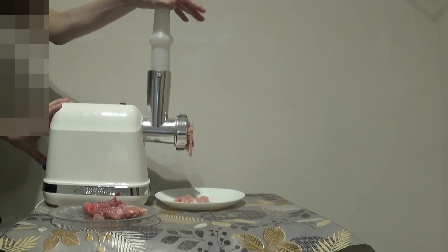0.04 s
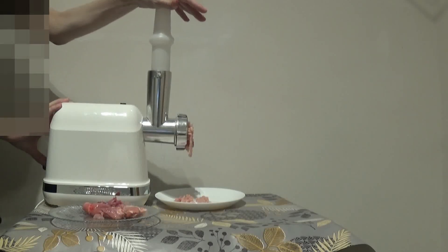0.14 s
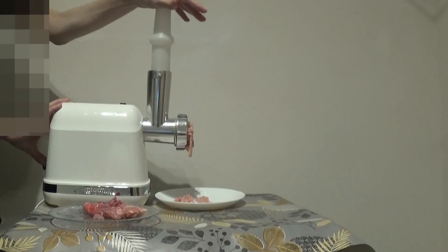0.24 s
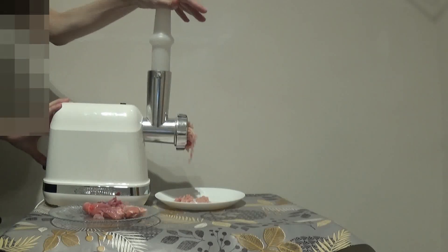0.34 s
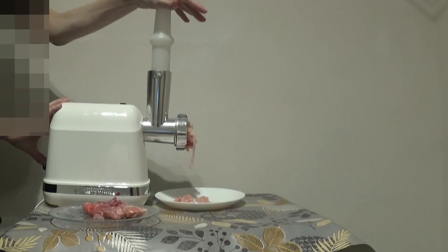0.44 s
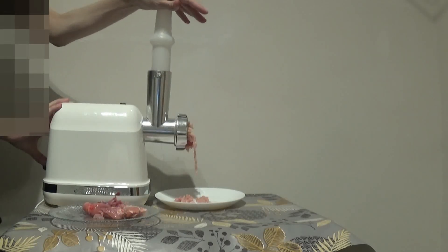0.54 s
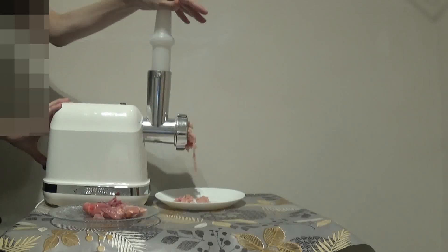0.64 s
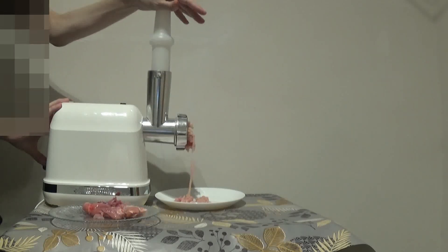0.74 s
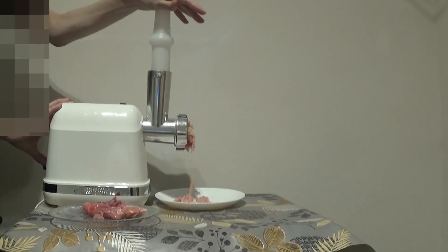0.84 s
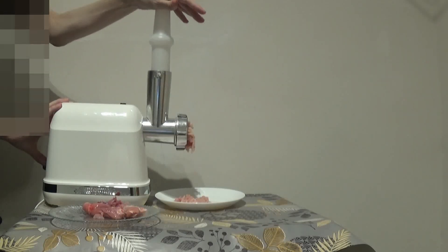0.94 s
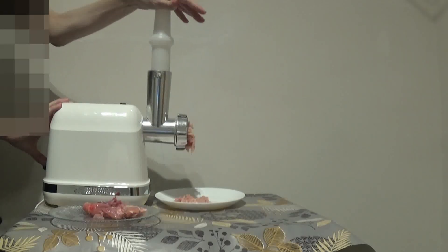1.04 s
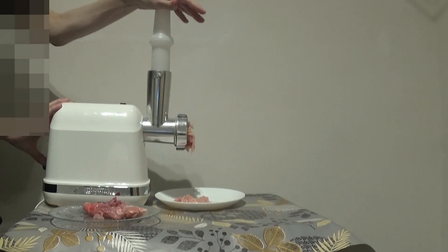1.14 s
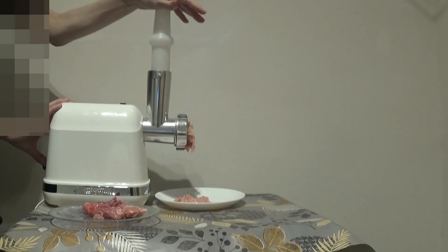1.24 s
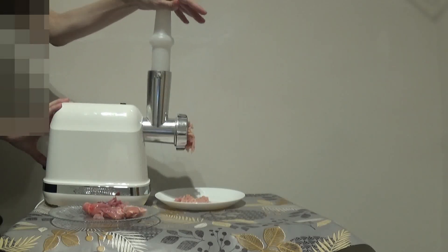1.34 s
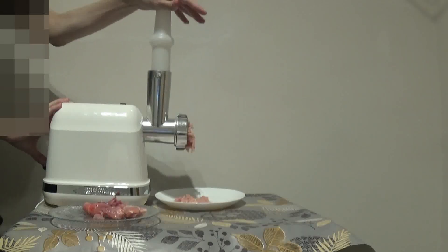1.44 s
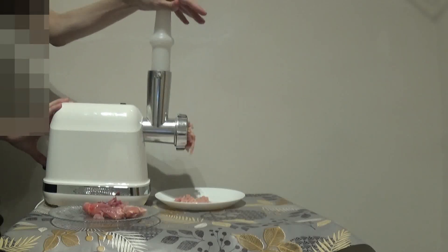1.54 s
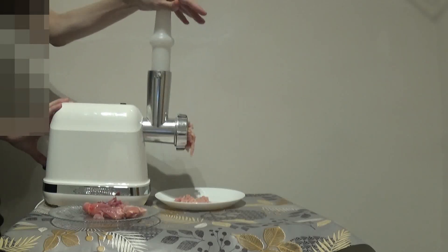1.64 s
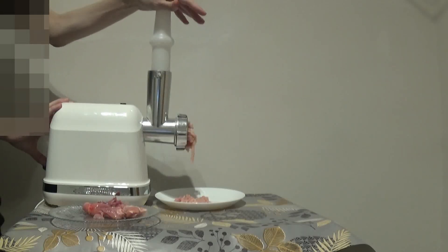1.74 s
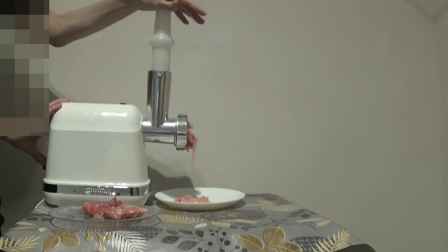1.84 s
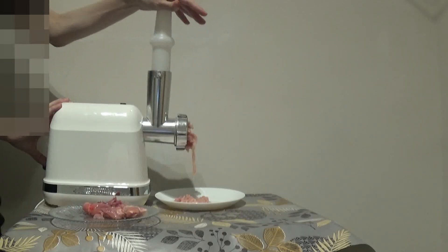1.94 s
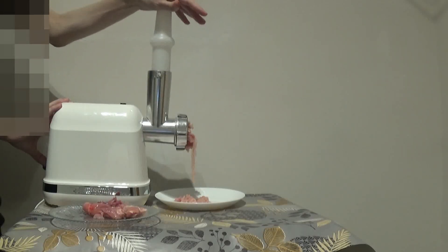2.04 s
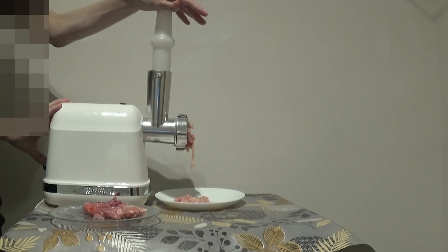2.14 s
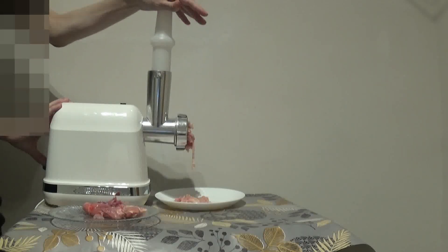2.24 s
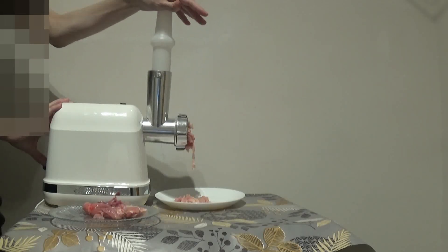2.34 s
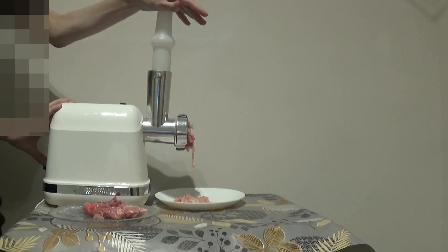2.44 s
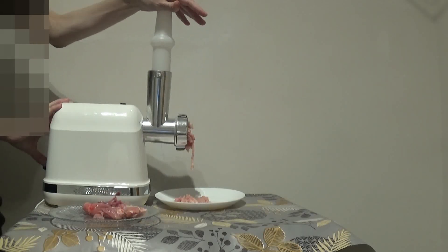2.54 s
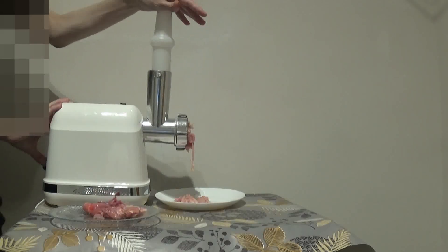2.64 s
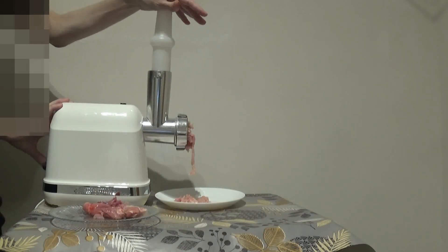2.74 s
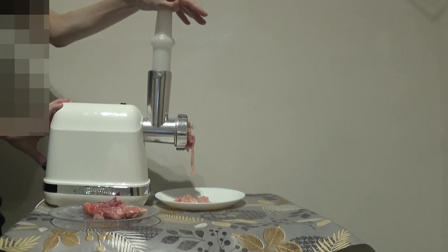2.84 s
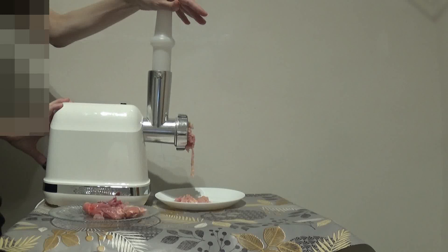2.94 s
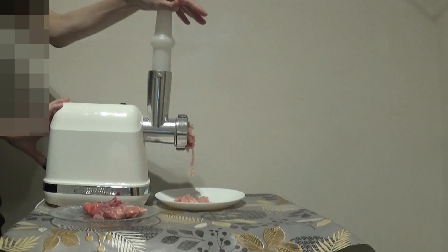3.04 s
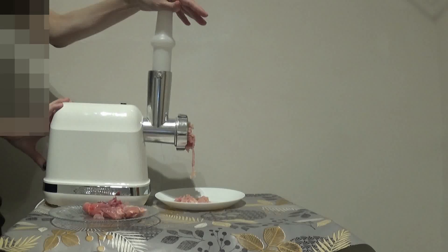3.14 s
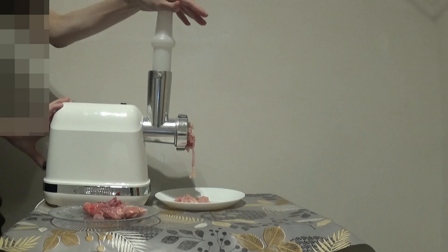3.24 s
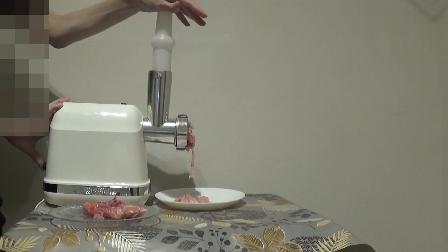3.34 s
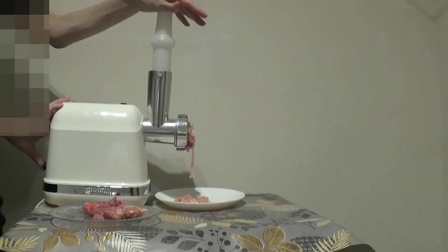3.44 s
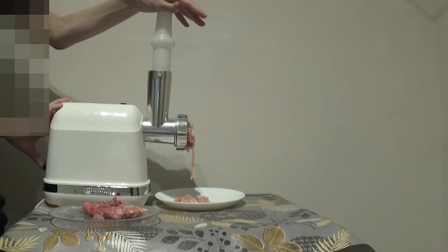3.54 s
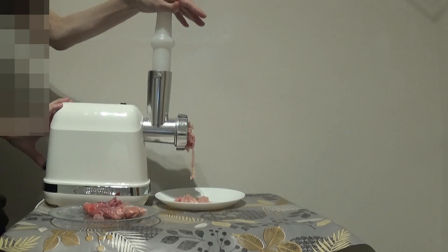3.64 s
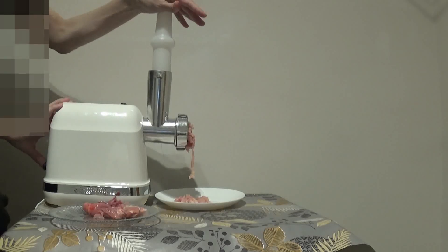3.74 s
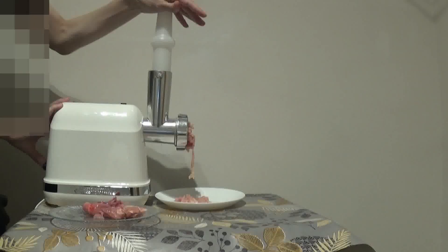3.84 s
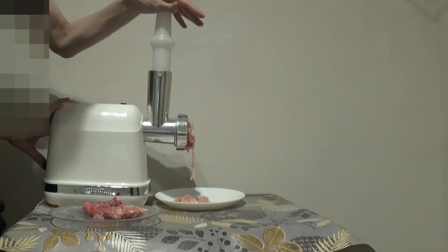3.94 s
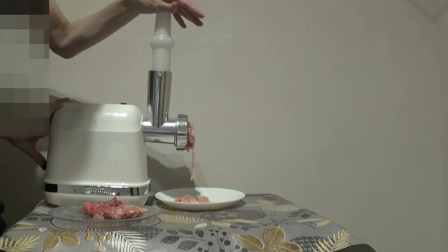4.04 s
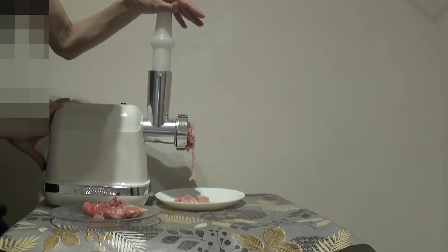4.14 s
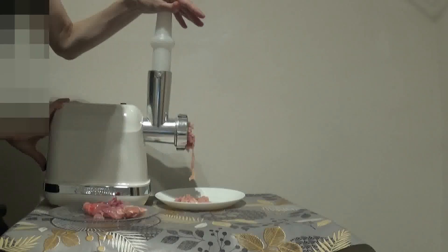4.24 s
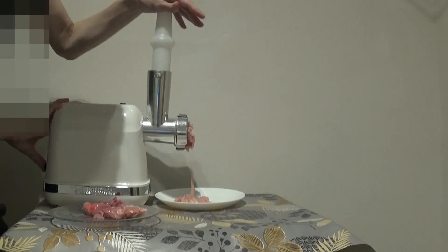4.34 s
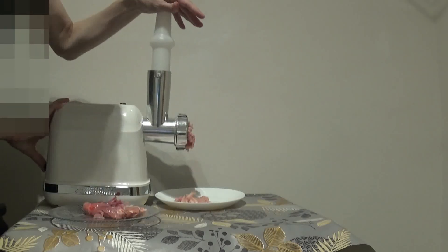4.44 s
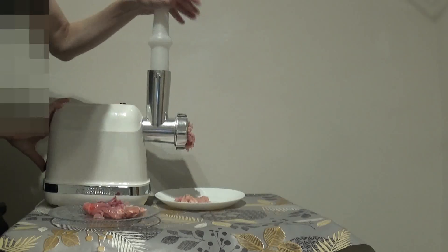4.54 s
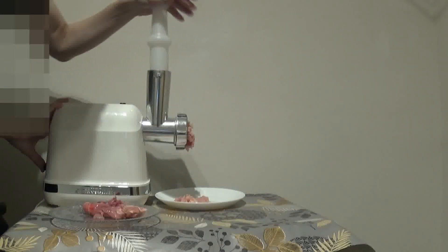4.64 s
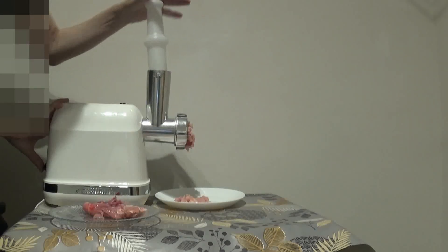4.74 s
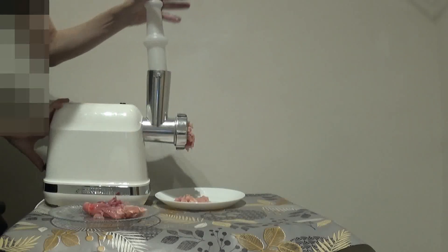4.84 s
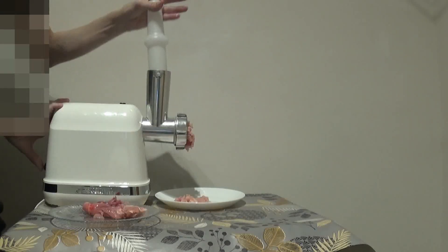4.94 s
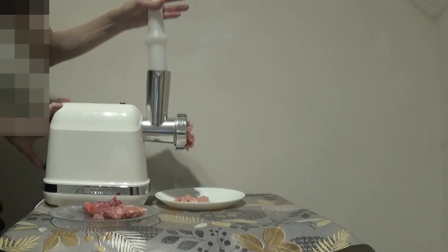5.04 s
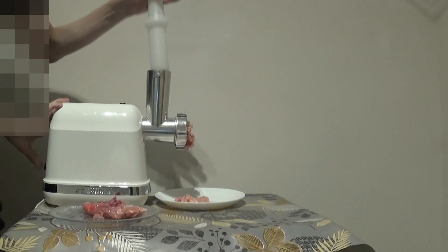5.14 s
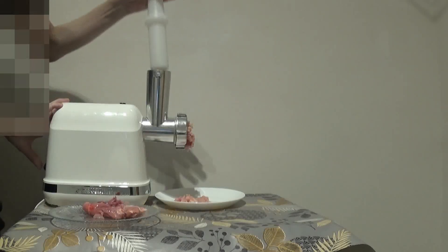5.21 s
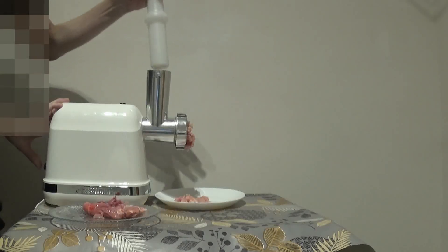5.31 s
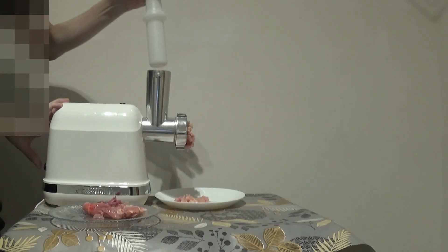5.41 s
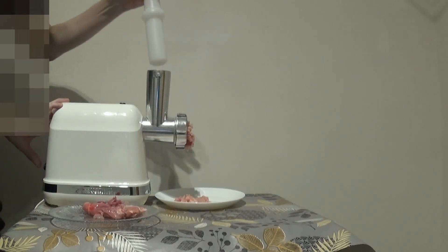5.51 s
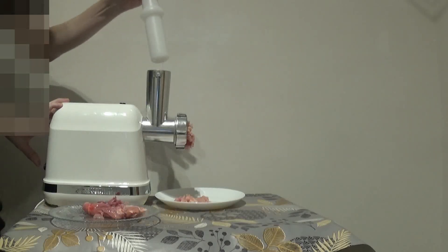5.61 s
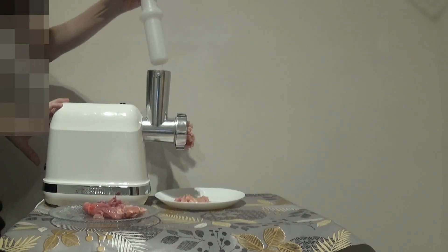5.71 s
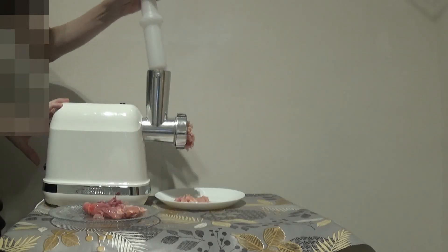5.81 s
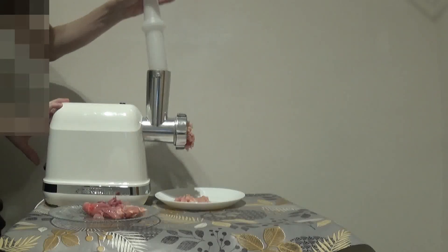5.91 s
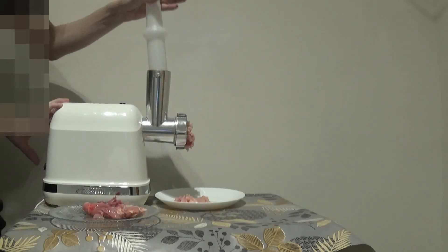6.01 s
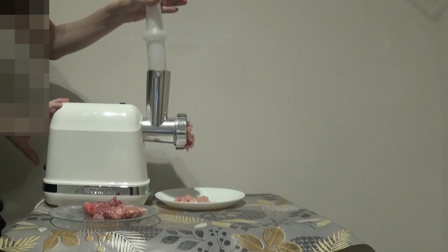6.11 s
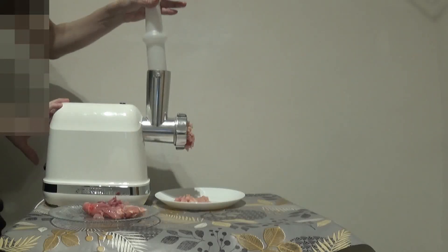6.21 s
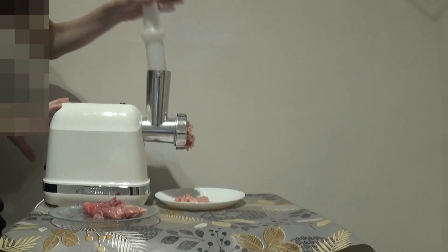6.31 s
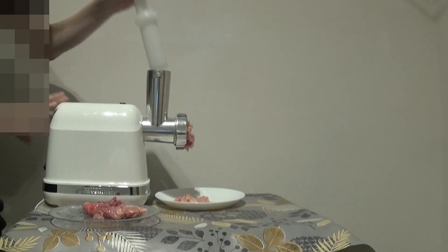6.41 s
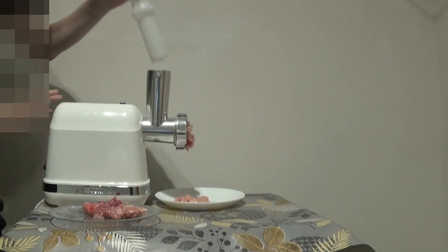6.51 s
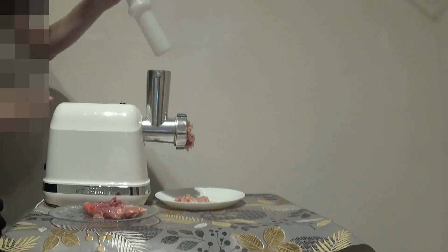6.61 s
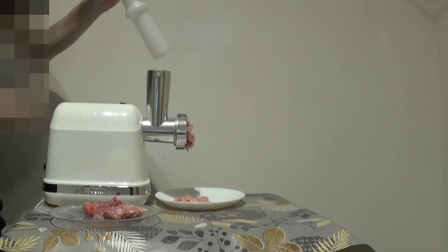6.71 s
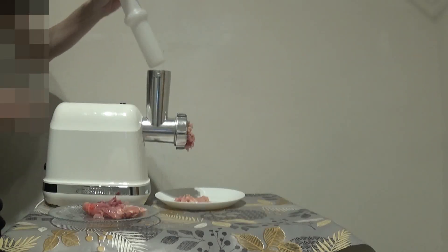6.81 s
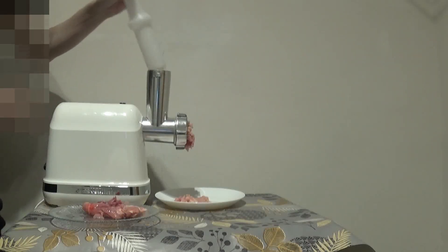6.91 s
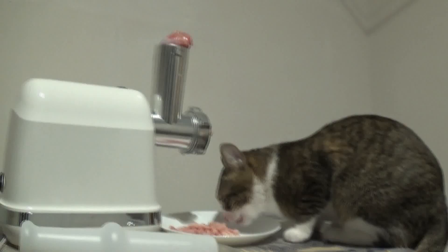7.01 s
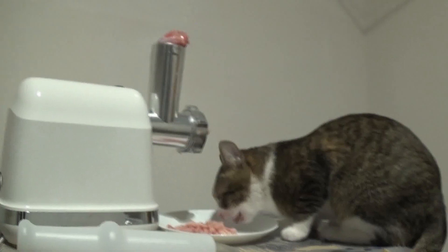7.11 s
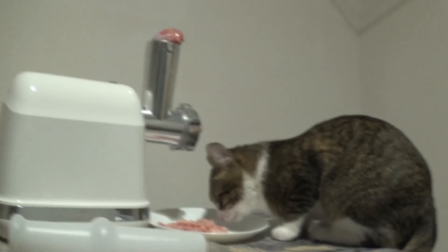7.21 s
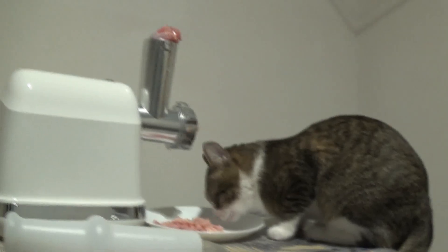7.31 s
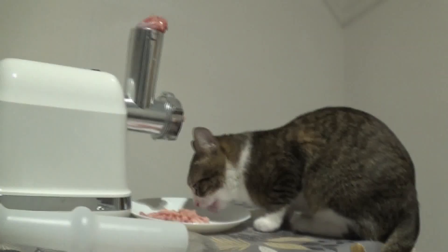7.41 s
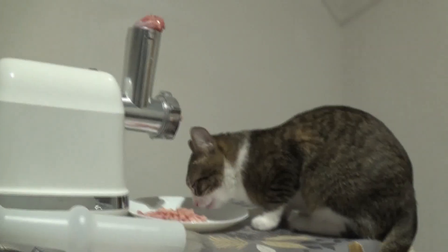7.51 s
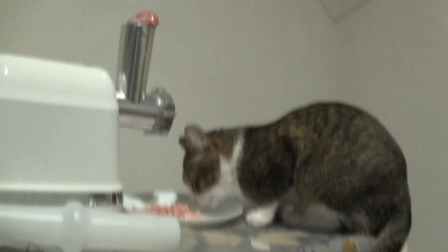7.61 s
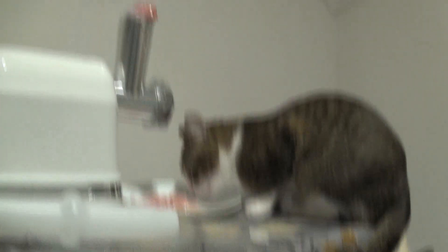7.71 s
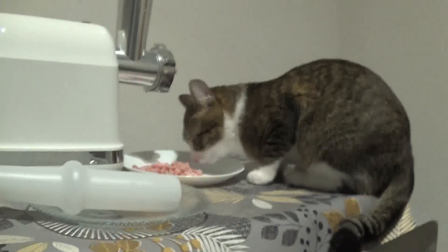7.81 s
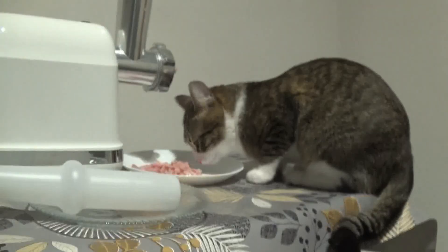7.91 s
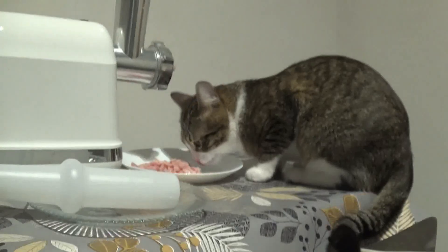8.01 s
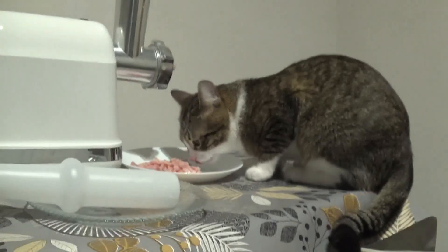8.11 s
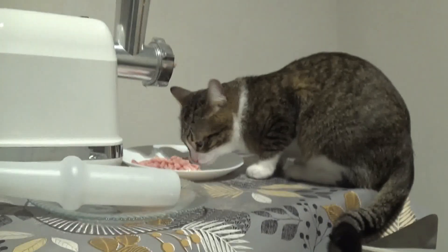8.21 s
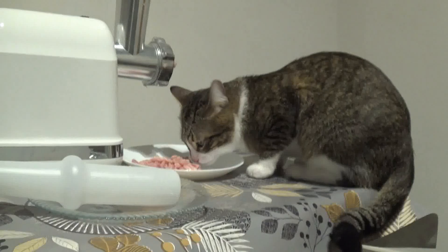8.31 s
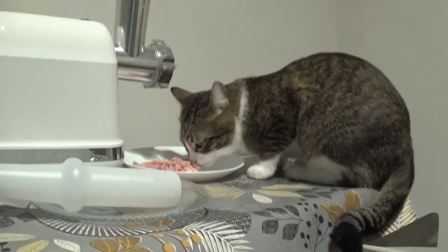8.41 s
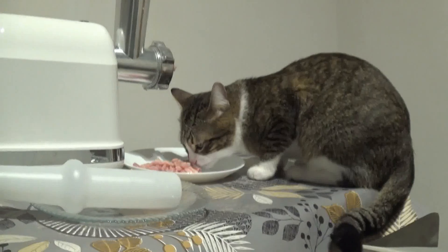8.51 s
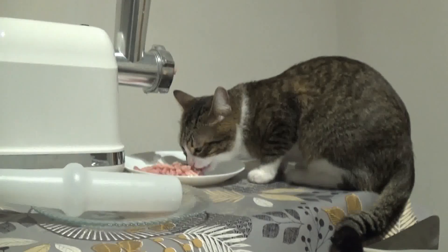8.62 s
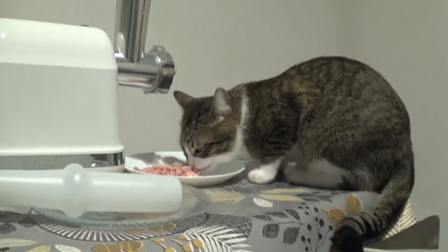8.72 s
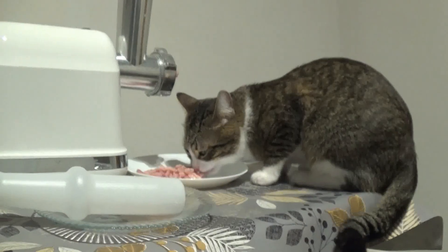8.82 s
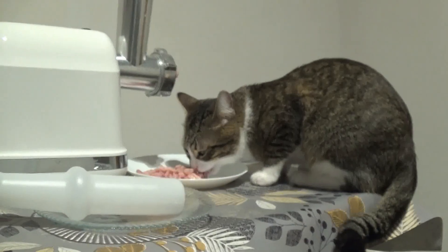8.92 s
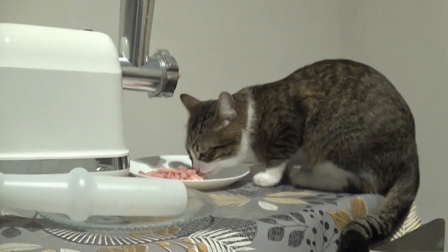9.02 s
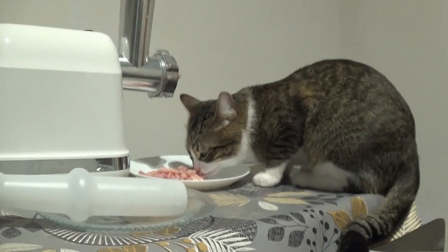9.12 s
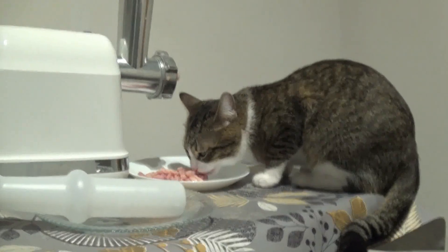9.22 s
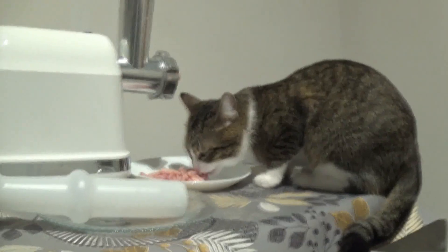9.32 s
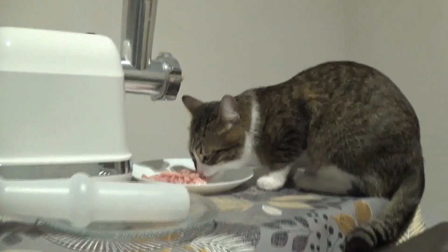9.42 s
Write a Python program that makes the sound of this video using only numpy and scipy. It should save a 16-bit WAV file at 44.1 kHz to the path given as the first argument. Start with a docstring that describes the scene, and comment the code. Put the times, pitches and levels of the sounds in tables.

```python
"""A small kitchen, a close-spaced stereo pair near the table. An electric meat grinder is running: gears rattle
in the plastic housing, brushes hiss, shaft and gears whine. Switched off, it coasts to a stop; the pusher
knocks in the feed tube and slides out. The sound drops out for a moment, then a cat eats the mince from a plate
with small wet clicks, over faint room tone."""
import sys
import numpy as np
from scipy import signal
from scipy.fft import rfft, irfft, next_fast_len
from scipy.io import wavfile
from scipy.ndimage import uniform_filter1d, map_coordinates

SR = 44100
rng = np.random.default_rng(int(sys.argv[2]) if len(sys.argv) > 2 else 0)


def unload_audio(sound):
    """Save the sound as a 16-bit wav file, at the path given as the first command line argument."""
    columns = np.transpose(np.atleast_2d(sound))
    # keep every value between -1 and 1, then stretch to whole-number steps
    steps = np.round(np.clip(columns, -1, 1) * 32767)
    wavfile.write(sys.argv[1], SR, steps.astype(np.int16))


N = 417186

OFF_S, STOP_S = 4.258, 5.453  # switched off, at rest
PAUSE_START_S, PAUSE_END_S = 7.003, 7.08
LABOURING_HZ, EASY_HZ = 320.5, 325.5  # motor speed with a full and a nearly empty screw
SETTLE_HZ = 44  # below this motor speed the teeth stop striking
GEAR_RATIO = 8 / 13  # gear cycles per motor turn
TEETH_PER_TURN = 4 * GEAR_RATIO


def motor_speed():
    """Turns per second: held up by the mains, then braked by dry friction and square-law fan drag."""
    # speed under power, rising as the meat clears: (time [s], speed [turns/s])
    powered = [(0, 320.7), (0.55, 319.7), (0.7, 321), (1.1, 321.4), (1.6, 324), (2.6, 325), (3.2, 324.9),
               (3.9, 326.7), (4.25, 326)]
    time_left = np.clip((STOP_S - clock()) / (STOP_S - OFF_S), 0, 1)
    drag = np.sqrt(1.19)  # fan drag is 1.19 times the friction at full speed
    return np.interp(clock(), *np.transpose(powered)) * np.tan(np.arctan(drag) * time_left) / drag


def gears_and_brushes(turns, speed, power):
    """Gear teeth rattle as they strike, and the brushes scrape hardest once a turn."""
    # noise spectrum under power: (frequency [Hz], level [dB])
    loaded = [(30, -33.5), (130, -31.5), (220, -25.5), (330, -12.5), (600, -4.5), (1100, 0.5), (2400, -6.5),
              (3200, -3.5), (4500, -7), (7000, -8.5), (10000, -6), (12400, -17.5)]
    # noise spectrum while coasting: (frequency [Hz], level [dB])
    loose = [(30, -45.5), (120, -42.5), (170, -35.5), (240, -24.5), (350, -10.5), (600, -5.5), (1100, -2),
             (2400, -8), (3200, -6), (4500, -12), (7000, -19.5), (10000, -18), (12400, -29)]
    # narrow housing resonances while coasting: (frequency [Hz], width [Hz], lift [dB])
    housing_modes = [(527, 70, 2), (1055, 70, 4.5), (1700, 50, 3), (2170, 50, 3)]
    low = lambda hz: 1 / np.sqrt(1 + (hz / 4250) ** 16)
    high = lambda hz: np.sqrt(1 - low(hz) ** 2)
    strikes = np.exp(-(TEETH_PER_TURN * turns % 1))
    strikes /= np.sqrt(uniform_filter1d(strikes ** 2, size=2000))
    brushes = 1 + .2 * np.cos(2 * np.pi * turns)
    rattle, hiss = np.zeros((2, 2, N))
    for spectrum, share in ((loaded, power), (loose, 1 - power)):
        gain = grinder_colour(spectrum)
        rattle += np.sqrt(share) * stereo(strikes * noise(), lambda hz: gain(hz) * low(hz))
        hiss += np.sqrt(share) * stereo(brushes * noise(), lambda hz: gain(hz) * high(hz))
    # slow teeth meet softly and sound duller
    soft = filtered(rattle, lambda hz: flat_band(hz, 0, 2130))
    rattle = soft + np.clip(speed / 140, .15, 1) * (rattle - soft)
    # the housing rings as the grinder coasts
    ring = lambda hz: sum((amp(db) - 1) * peak(hz, f, width) for f, width, db in housing_modes)
    rattle += (1 - power) * filtered(rattle, ring)
    moving = np.minimum(speed / SETTLE_HZ, 1)
    rattle *= ring_out(amp(-18) * moving)
    hiss *= ring_out(amp(-22.5) * (speed / EASY_HZ) ** .68 * moving)
    return (rattle + hiss) * amp(.6 * wobble(90))


def grinder_colour(spectrum):
    """A broad spectrum with peaks: housing resonances and bands around the gear and shaft tones."""
    # peaks in the grinder's noise: (frequency [Hz], width [Hz], lift [dB])
    peaks = [(364, 20, 2.5), (697, 22, 3), (726, 28, 6), (780, 26, 0.5), (1223, 210, 4), (1630, 45, 6),
             (1760, 138, 6), (1986, 73, 6), (2232, 390, 6.5), (2324, 35, 7), (2620, 190, 5.5),
             (3000, 98, 2), (3744, 49, 9), (6360, 429, 2.5), (7900, 195, 2), (9420, 288, 4)]
    return lambda hz: amp(along(spectrum, hz) + sum(db * peak(hz, f, width) for f, width, db in peaks))


def ring_out(gain, t60=.33):
    """A noise's gain cannot fall faster than the housing and the room ring out."""
    decay = 10 ** (-6 / (t60 * SR))
    energy, _ = signal.lfilter([1 - decay], [1, -decay], gain ** 2, zi=[decay * gain[0] ** 2])
    return np.sqrt(energy)


def driven_whine(turns, speed, power):
    """Tones locked to shaft and gears shift with the load, waver, and fade when the power is cut."""
    # shaft tones that follow the load: (multiple of the shaft rate, labouring [dB], easy [dB])
    load_lines = [(1.003, -51, -39), (2.002, -32.5, -29), (9.99, -53.5, -32), (24, -36, -33.5)]
    # gear mesh tones: (multiple of the mesh rate, labouring [dB], easy [dB])
    mesh_lines = [(1, -40, -28.5), (2, -27, -38.5), (3, -26, -32)]
    # weaker shaft tones: (multiple of the shaft rate, level [dB])
    shaft_lines = [(3, -38.5), (4, -36), (7, -37.5), (8, -34), (9, -35.5), (12, -39), (15, -41.5),
                   (16, -42), (19, -41.5), (29, -49), (32, -52), (33, -47), (34, -43)]
    # gear tones: (multiple of the gear cycle rate, level [dB])
    gear_lines = [(6, -36.5), (9, -39), (10, -35), (16, -39), (17, -43)]
    cleared = np.clip((np.maximum.accumulate(speed) - LABOURING_HZ) / (EASY_HZ - LABOURING_HZ), 0, 1)
    strong = load_lines + [(TEETH_PER_TURN * k, labouring, easy) for k, labouring, easy in mesh_lines]
    lines = [(k, labouring + cleared * (easy - labouring)) for k, labouring, easy in strong]
    lines += shaft_lines + [(k * GEAR_RATIO, db) for k, db in gear_lines]
    angle = 2 * np.pi * turns + .015 * wobble(12)  # the meat loads the shaft unevenly
    mid, side = np.zeros((2, N))
    for k, db in lines:
        looseness = min(k / 5, 1)  # the lowest tones are the steadiest
        level = amp(db + 1.6 * looseness * wobble(14))
        line = level * np.sin(k * angle + .22 * looseness * wobble(35))
        mid += line
        side += line * rng.normal(.06, .2 * looseness)
    return np.sqrt(2) * power * np.array([mid + side, mid - side])


def coasting_whine(turns, speed, power, bars=24):
    """Commutator and gear harmonics slide down through the housing's bands; the unbalanced rotor hums."""
    # commutator whine: (multiple of the bar rate, level [dB])
    harmonics = [(1, -30.5), (2, -30), (3, -35.5), (4, -39.5), (5, -44), (6, -47.5), (7, -50)]
    tone = lambda k: amp(1.6 * wobble(60)) * np.sin(2 * np.pi * k * turns + .35 * wobble(120))
    through = lambda k, centre_hz, reach_hz: tone(k) * flat_band(k * speed, centre_hz, reach_hz)
    commutator = sum(amp(db) * through(bars * k, 9800, 2500) for k, db in harmonics)
    mesh = sum(through(TEETH_PER_TURN * k, 1300, 480) for k in range(1, 7))
    mesh *= amp(-27) * np.minimum(speed / 180, 1)
    rotor = amp(-32.5) * (speed / EASY_HZ) ** 3.6 * tone(1)
    return (1 - power) * np.minimum(speed / SETTLE_HZ, 1) * (commutator + rotor + mesh)


def pusher_knocks():
    """The plastic pusher knocks the metal tube: a crack, a dense thud and the tube's modes."""
    # hits on the feed tube: (time [s], level [dB])
    knocks = [(5.853, -17.5), (5.858, -25.5), (5.905, -25), (5.947, -31.5), (6.534, -48.5), (6.924, -39.5),
              (6.939, -44.5)]
    # tube modes: (frequency [Hz], level [dB], t60 before the cap [s])
    tube_modes = [(796, -1, 0.62), (1090, 0, 0.38), (1421, -15, 0.29), (1545, -8, 0.17), (1660, -11, 0.25),
                  (1910, 1, 0.82), (2110, -5, 0.26), (3260, -10, 0.3), (5730, 0, 0.068)]
    # thud spectrum: (frequency [Hz], level [dB])
    thud_colour = [(88, -58), (150, -33), (400, -16), (481, -8), (793, -3), (1240, -7), (1730, -1.5),
                   (2550, -18), (3120, -12.5), (4350, -25), (10000, -23), (12500, -37), (16200, -63.5),
                   (22000, -120)]
    out, t = np.zeros(N), np.arange(SR // 2) / SR
    for s, db in knocks:
        ring = sum(amp(level + rng.normal(0, 1.1) - 60 * t / min(t60, .4)) * np.sin(2 * np.pi * hz * t)
                   for hz, level, t60 in tube_modes)
        thud = unit(filtered(rng.standard_normal(len(t)), colour(thud_colour)))
        thud *= amp(-8 - 60 * t / .055)
        crack = rng.standard_normal(len(t)) * amp(-11.5 - 60 * t / .009)
        add(out, s, amp(db) * (amp(-27) * ring + thud + crack))
    return out


def pusher_slides(reflection=.45):
    """The pusher scrapes the tube; the air column's resonances shift as it moves."""
    # strokes: (start [s], end [s], level [dB], air column at the start [m], at the end [m])
    slides = [(5.908, 6.141, -49.5, .12, 0.16), (6.294, 6.47, -47, .145, .125)]
    # scrape spectrum: (frequency [Hz], level [dB])
    scrape_colour = [(150, -22), (500, 4.5), (1200, -6.5), (2500, -2.5), (4400, 2.5), (5500, -2.5),
                     (7500, -0.5), (10000, -5.5), (12500, -10.5)]
    out, t = np.zeros((2, N)), clock()
    scrape = stereo(amp(3 * wobble(300)) * noise(), colour(scrape_colour))
    for start, end, db, from_m, to_m in slides:
        at = np.flatnonzero((t > start) & (t < end))
        progress = np.linspace(0, 1, len(at))
        round_trip = 2 * (from_m + (to_m - from_m) * progress) / 343 * SR
        echoes = sum(reflection ** k * scrape[:, at - np.round(k * round_trip).astype(int)]
                     for k in range(5))
        out[:, at] += amp(db) * arch(progress) ** .7 * unit(echoes)
    return out


def cat_bites(open_mouth_hz=1050, click_t60=.0059):
    """Each smack is a ring of the mouth cavity, a wet tick, a soft jaw thump and a click of teeth."""
    # smacks: (time [s], mouth ring [dB], mouth resonance [Hz], wet tick [dB])
    bites = [(7.096, -56, 807, -74), (7.21, -54.5, 1170, -58.5), (7.374, -58.5, 778, -74),
             (7.487, -61.5, 754, -80), (7.534, -62.5, 647, -79.5), (7.621, -59, 861, -75),
             (7.648, -50.5, 690, -54), (7.664, -44.5, 865, -41), (7.686, -48, 1730, -69),
             (7.937, -57, 940, -66), (8.256, -60, 1270, -80), (8.394, -54.5, 1840, -74.5),
             (8.456, -61, 821, -71), (8.521, -59, 646, -81), (8.589, -62, 650, -68.5),
             (8.877, -50, 995, -59.5), (8.892, -48.5, 1013, -62.5), (8.921, -51.5, 1860, -72.5),
             (8.968, -65.5, 1910, -65), (9.181, -59.5, 1040, -69), (9.224, -55, 990, -53),
             (9.241, -56, 1072, -74), (9.312, -56.5, 708, -59.5)]
    out, t = np.zeros(N), np.arange(SR // 10) / SR

    def burst(t60, centre_hz, q):
        """Dying noise through one resonance."""
        response = lambda hz: 1j * hz / (q * (centre_hz - hz ** 2 / centre_hz) + 1j * hz)
        return unit(filtered(rng.standard_normal(len(t)) * amp(-60 * t / t60), response))

    for s, db, mouth_hz, tick_db in bites:
        opening = max(np.log2(mouth_hz / open_mouth_hz), 0)  # an open mouth rings higher, thumps less
        ring = amp(db) * burst(.035, mouth_hz, q=4.5)
        tick = amp(tick_db) * burst(click_t60, 8600, q=1.5)
        thump = amp(db - 16.5 - 24 * opening) * burst(.043, 210, q=1.4)
        teeth = amp(db - 8) * burst(click_t60, 2500, q=2.6)
        add(out, s, ring + tick + thump + teeth)
    return out


def saliva(count=18):
    """Tiny wet ticks scattered among the bites."""
    out, t = np.zeros(N), np.arange(SR // 200) / SR
    for s, db in zip(rng.uniform(PAUSE_END_S, N / SR, count), rng.normal(-41, 3, count)):
        add(out, s, amp(db - 60 * t / .003) * rng.standard_normal(len(t)))
    return filtered(out, lambda hz: 1j * hz / (4000 + 1j * hz))


def rustles():
    """Handling noise and food on the plate: strokes of grainy friction that swell and fade."""
    # strokes: (start [s], end [s], level [dB])
    strokes = [(6.923, 7.038, -54), (7.389, 7.45, -53), (8.71, 8.784, -56.5), (8.866, 8.921, -42.5),
               (9.169, 9.292, -55), (9.269, 9.49, -52)]
    # body of a rustle: (frequency [Hz], level [dB])
    body_colour = [(50, -24), (90, -15), (130, -4.5), (300, -7), (450, -6), (700, 4), (850, 1), (1000, 3),
                   (1250, -4.5), (3000, -8.5), (6000, -29.5)]
    # its crisp top: (frequency [Hz], level [dB])
    treble_colour = [(1500, -23.5), (2800, -6.5), (3700, 1.5), (4500, 0), (6000, -8), (9500, 0.5),
                     (12500, -13.5)]
    swell = sum(amp(db) * arch((clock() - start) / (end - start)) ** .84 for start, end, db in strokes)
    grains = amp(4 * wobble(300))
    body = stereo(grains * noise(), colour(body_colour))
    treble = stereo(grains * noise(), colour(treble_colour))
    return swell * (body + amp(-4.5) * treble)


def standing_waves(x, spacing_hz=30, ripple_db=1.3):
    """Reflections from wall and table leave fine peaks and dips in a steady noise at the microphones."""
    knots = np.arange(0, SR / 2, spacing_hz)
    gains = unit(amp(ripple_db * rng.standard_normal(len(knots))))
    return filtered(x, lambda hz: np.interp(hz, knots, gains))


def kitchen_reverb(x):
    """The room's answer; the treble dies first."""
    # decay of the room: (frequency [Hz], t60 [s])
    decay = [(200, 0.45), (1500, 0.37), (10000, 0.21)]
    hz, t, spectra = signal.stft(rng.standard_normal((2, SR // 2)), SR, nperseg=256)
    _, tail = signal.istft(spectra * amp(-60 * t / along(decay, hz)[:, None]), SR, nperseg=256)
    tail = tail + .43 * tail[::-1]  # the two microphones are close together
    return signal.fftconvolve(x[None], tail / np.linalg.norm(tail[0]), axes=1)[:, :N]


def room_tone(pulse_hz=25):
    """Faint hiss and hum, with a fuzzy high whistle and a pulsing one above it."""
    # hiss spectrum: (frequency [Hz], level [dB])
    hiss_colour = [(20, -17.5), (75, -18.5), (150, -8), (350, -1.5), (600, 5), (1100, -1), (2000, -4.5),
                   (3300, -3.5), (5000, -8.5), (8000, -11), (11000, -10), (12500, -19)]
    # hum: (frequency [Hz], level before the pause [dB], level after it [dB])
    hum_lines = [(50, -96.5, -93), (99, -84.5, -88), (158, -79.5, -84), (201, -80.5, -78), (252, -81, -83),
                 (442, -67.5, -74.5), (650, -61.5, -71.5)]
    t = clock()
    later = t > PAUSE_START_S
    hiss = amp(np.where(later, -61.5, -60.5)) * stereo(noise(), colour(hiss_colour))
    hum = sum(amp(np.where(later, after, before)) * np.sin(2 * np.pi * hz * t)
              for hz, before, after in hum_lines)
    whistle = amp(-66.5) * stereo(noise(), lambda hz: peak(hz, 2910, 160))
    pulses = np.abs(np.sin(np.pi * pulse_hz * t)) ** 3
    chirp = amp(-67) * pulses * np.sin(2 * np.pi * 3500 * t + wobble(60))
    return hiss + hum + whistle + chirp


def stereo(pair, gain):
    """Two unrelated signals become a coloured left and right of rms 1, partly alike at the microphones."""
    # likeness of left and right: (frequency [Hz], correlation)
    likeness = [(60, 0.91), (130, 0.94), (280, 0.92), (590, 0.81), (1270, 0.72), (2730, 0.77), (5850, 0.85),
                (12600, 1)]
    angle = lambda hz: np.arccos(along(likeness, hz)) / 2
    mid, side = filtered(pair, lambda hz: gain(hz) * np.array([np.cos(angle(hz)), np.sin(angle(hz))]))
    return unit(np.array([mid + side, mid - side]))


def contact_band(x, low_hz, high_hz):
    """Small contacts carry no deep bass and little of the highest treble."""
    return signal.sosfilt(signal.butter(2, [low_hz, high_hz], "bandpass", fs=SR, output="sos"), x)


def amp(db):
    """Decibels to gain."""
    return 10 ** (np.asarray(db) / 20)


def unit(x):
    """Scaled to rms 1."""
    return x / np.sqrt(np.mean(x ** 2) + 1e-20)


def clock():
    """The time of each sample."""
    return np.arange(N) / SR


def noise():
    """Two channels of white noise."""
    return rng.standard_normal((2, N))


def wobble(rate):
    """A smooth random curve, rate knots a second."""
    knots = rng.standard_normal(int(N * rate / SR) + 4)
    return map_coordinates(knots, [np.arange(0, N, 32) * rate / SR]).repeat(32)[:N]


def arch(progress):
    """Half a sine as progress goes from 0 to 1."""
    return np.abs(np.sin(np.pi * np.clip(progress, 0, 1)))


def along(points, hz):
    """(Hz, value) points read on a log axis."""
    knots, values = np.transpose(points)
    return np.interp(np.log(hz + 1), np.log(knots + 1), values)


def colour(points):
    """(Hz, dB) points as a frequency response."""
    return lambda hz: amp(along(points, hz))


def peak(hz, centre, width):
    """A spectral peak of height 1."""
    return 1 / (1 + (2 * (hz - centre) / width) ** 2)


def flat_band(hz, centre, reach):
    """A flat-topped band, 3 dB down at centre +/- reach."""
    return 1 / np.sqrt(1 + ((hz - centre) / reach) ** 8)


def filtered(x, response):
    """x shaped by a frequency response."""
    n = x.shape[-1]
    padded = next_fast_len(n + SR // 8)
    return irfft(rfft(x, padded) * response(np.fft.rfftfreq(padded, 1 / SR)), padded)[..., :n]


def add(track, s, sound):
    """Mixes a sound into a track at time s."""
    part = track[round(s * SR):][:len(sound)]
    part += sound[:len(part)]


def scene():
    """One motor speed drives the whole grinder; the small sounds follow in the quiet."""
    speed = motor_speed()
    turns = np.cumsum(speed) / SR
    power = np.clip(1 - (clock() - OFF_S) / .06, 0, 1)
    grinder = standing_waves(gears_and_brushes(turns, speed, power))
    grinder += driven_whine(turns, speed, power) + coasting_whine(turns, speed, power)
    knocks = contact_band(pusher_knocks(), low_hz=220, high_hz=11480)
    cat = contact_band(cat_bites() + saliva(), low_hz=130, high_hz=11000)
    reverb = kitchen_reverb(amp(-2) * knocks + amp(-15.5) * cat)
    return grinder + knocks + pusher_slides() + cat + rustles() + reverb + room_tone()


def record(dry):
    """The highest peaks are rounded, the level drops during the pause, and the top treble is cut."""
    rounded = dry / (1 + np.abs(dry / .8) ** 8) ** (1 / 8)
    paused = (clock() >= PAUSE_START_S) & (clock() <= PAUSE_END_S)
    return filtered(rounded * np.where(paused, amp(-39), 1), lambda hz: hz < 12600)


dry = scene()
out = record(dry)
unload_audio(out)
```